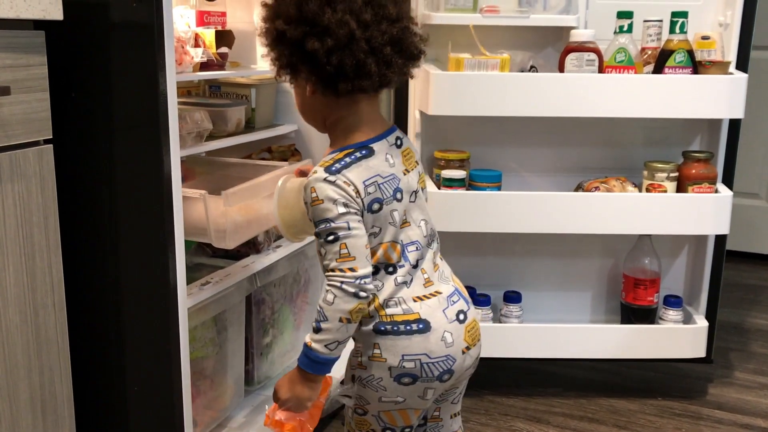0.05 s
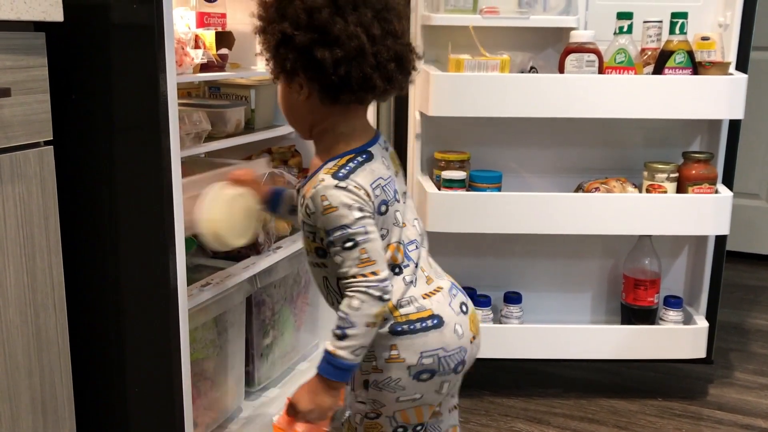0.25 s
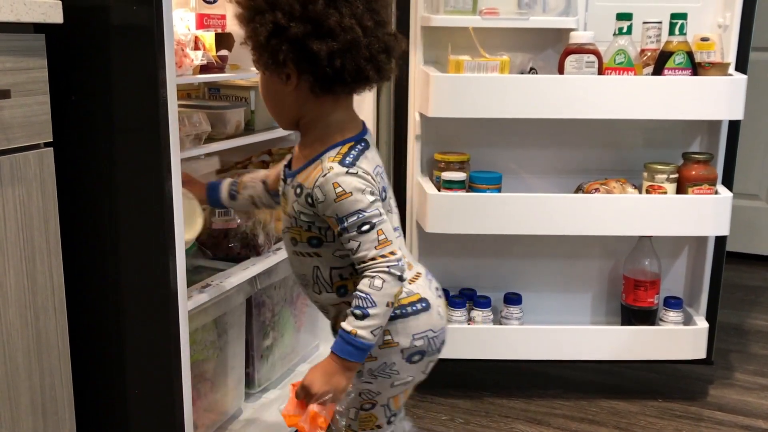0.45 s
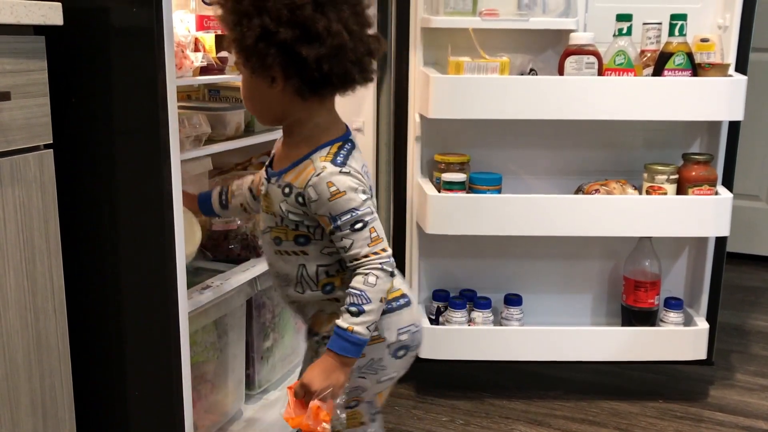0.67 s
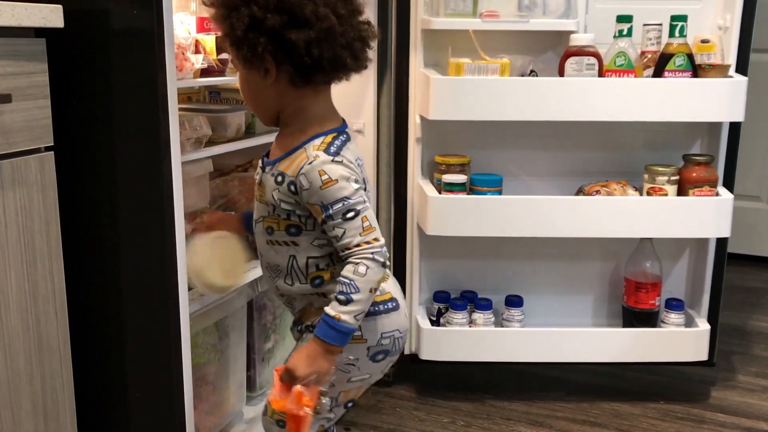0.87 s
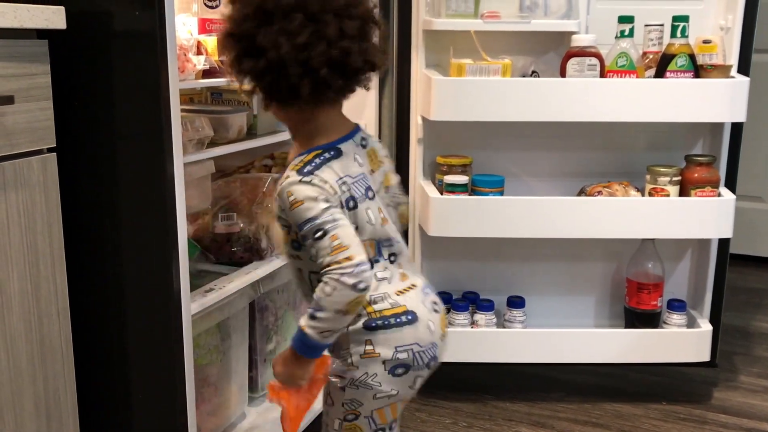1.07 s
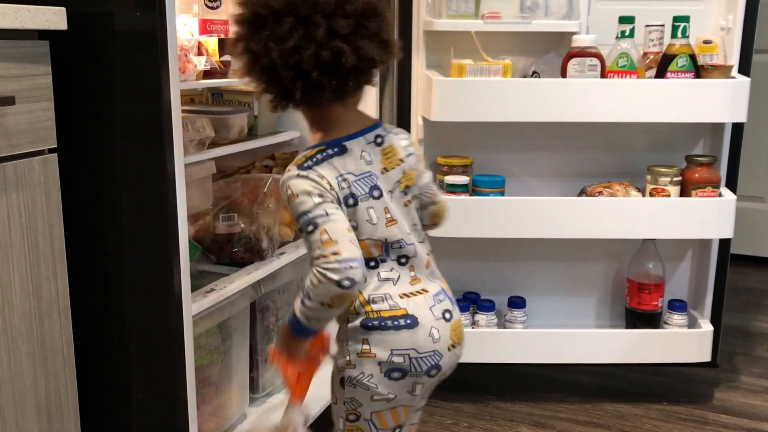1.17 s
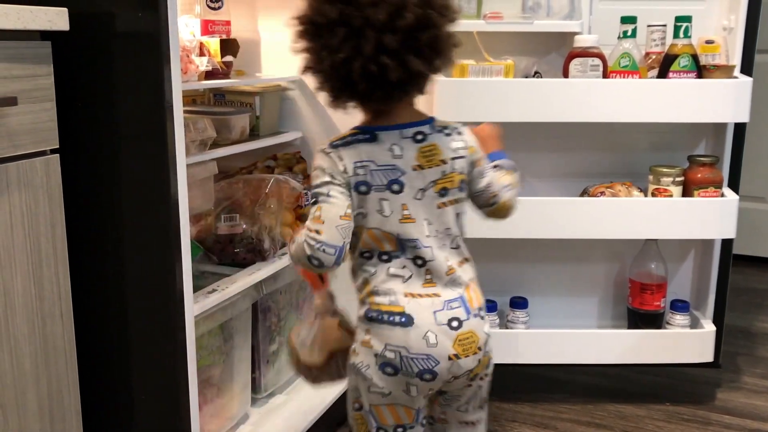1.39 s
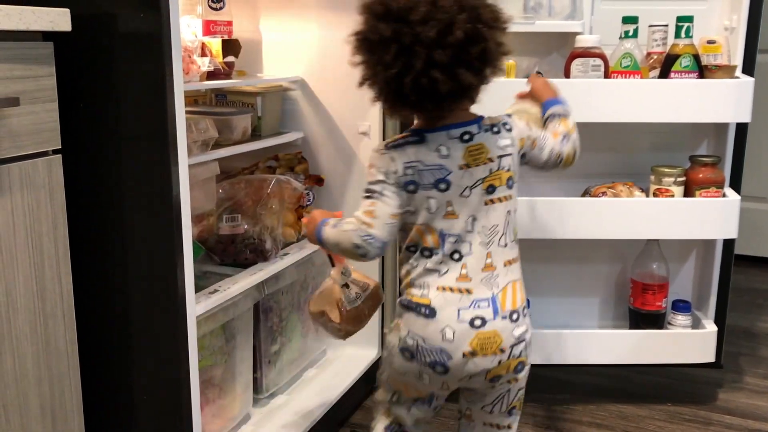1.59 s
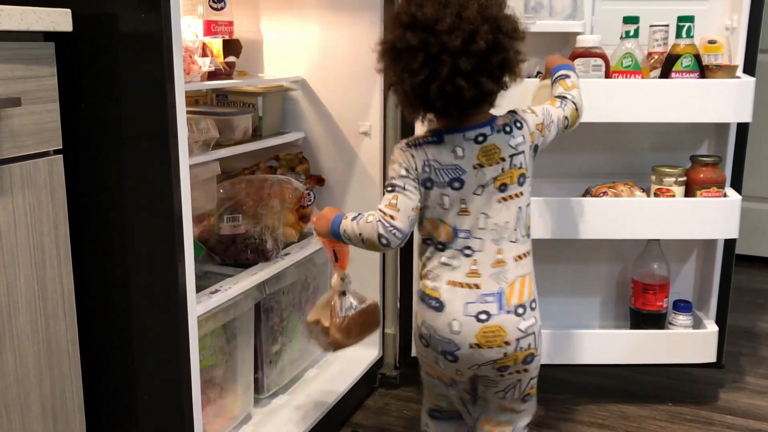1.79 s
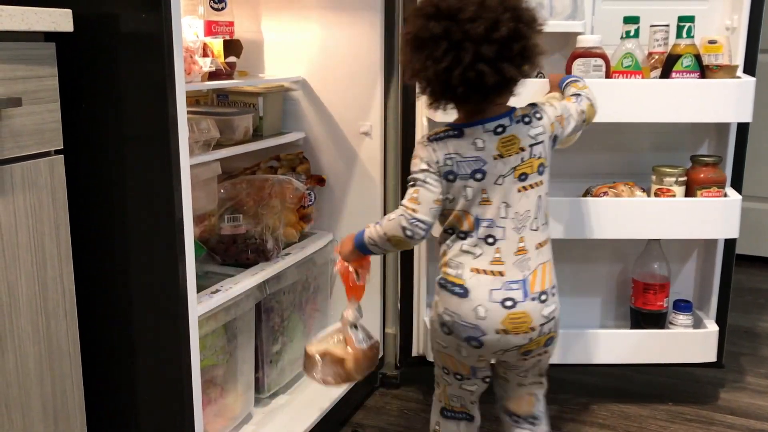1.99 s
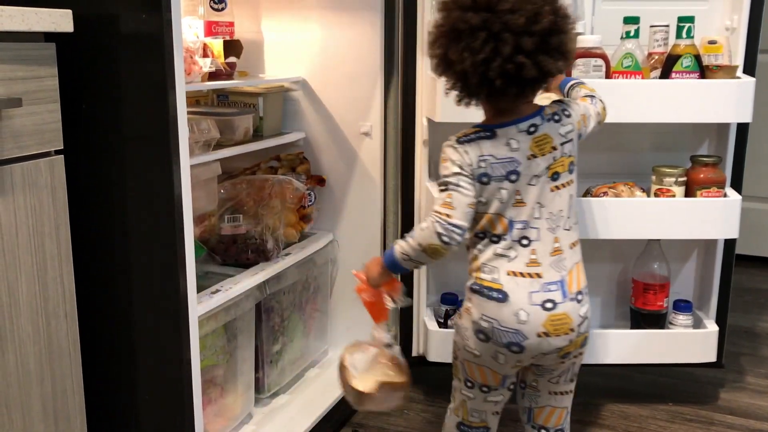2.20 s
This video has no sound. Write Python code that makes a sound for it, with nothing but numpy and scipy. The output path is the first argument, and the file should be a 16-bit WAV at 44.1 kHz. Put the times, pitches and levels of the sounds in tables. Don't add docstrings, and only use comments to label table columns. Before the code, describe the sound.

A plastic refrigerator drawer catches at about 0.2 seconds, knocks sharply near 0.25, and slides with rough chatter until it bangs shut at 0.6, rebounding and rattling until 0.75. Quiet thin-bag crackles and tiny ticks follow from 0.9 to 1.85. At 1.94 a container clunks softly onto a ringing shelf and settles. A low fan hum and short kitchen reverberation surround it, heard by a close small microphone.

```python
import sys
import numpy as np
from scipy import signal
from scipy.fft import rfft, irfft
from scipy.io import wavfile
from scipy.ndimage import uniform_filter1d

SR = 44100
rng = np.random.default_rng(int(sys.argv[2]) if len(sys.argv) > 2 else 0)


def file_out(sig):
    cols = np.atleast_2d(sig).T
    lim = np.clip(cols, -1, 1)
    pcm = np.round(lim * 32767).astype(np.int16)
    wavfile.write(sys.argv[1], SR, pcm)


def ratio(d):
    e = np.asarray(d, float) / 20
    return 10 ** e


N = 99225


def evened(x):
    return x / np.sqrt(np.mean(x ** 2) + 1e-20)


def read(points, hz):
    f, value = np.transpose(points)
    return np.interp(np.log(hz + 1), np.log(f + 1), value)


def add(mix, start_s, sound):
    part = mix[round(start_s * SR):][:len(sound)]
    part += sound[:len(part)]


def colour(x, shape):
    gain = ratio(read(shape, np.fft.rfftfreq(len(x), 1 / SR)))
    return evened(irfft(rfft(x) * gain, len(x)))


def low_part(x, top_hz):
    return signal.lfilter(*signal.butter(2, top_hz, fs=SR), x)


def resonate(x, hz, width_hz):
    r = np.exp(-np.pi * max(width_hz, 1) / SR)
    return 2 * signal.lfilter([1 - r], [1, -r * np.exp(2j * np.pi * hz / SR)], x).real


def narrowed(x, hz, width_hz):
    return evened(resonate(resonate(x, hz, width_hz), hz, width_hz))


def ring(hz, t60_s, rise_s):
    t = np.arange(0, .5, 1 / SR)
    swell = np.sin(np.pi / 2 * np.minimum(t / rise_s, 1)) ** 2
    return swell * ratio(-60 * t / t60_s) * np.sin(2 * np.pi * hz * t)


# top in Hz, length in s.
SLIP_LENGTHS = [(700, 0.0045), (1300, .002), (2000, 0.002), (3000, 0.003), (4500, 0.003), (6500, 0.002),
                (9000, 0.002), (11500, .0015), (14000, .0015), (20000, 0.0015)]


def chatter(count):
    slips_per_s, spread_db, steady_share = 1500, 2.6, 1.2
    out = np.zeros(count)
    hz = np.fft.rfftfreq(count, 1 / SR)
    low_hz = 0
    for top_hz, length_s in SLIP_LENGTHS:
        size, chance = rng.random((2, count))
        slips = ratio(-spread_db * np.log(size + 1e-2)) * (chance < slips_per_s / SR)
        keep = np.exp(-1 / (SR * length_s))
        swells = evened(signal.lfilter([1], [1, -2 * keep, keep ** 2], slips)) ** 2
        puffs = evened((steady_share + swells) * rng.standard_normal(count))
        out += irfft(rfft(puffs) * ((hz >= low_hz) & (hz < top_hz)), count)
        low_hz = top_hz
    return evened(out)


# frequency in Hz, level in dB per Hz.
AIR = [(15, -70), (25, -42), (114, -12.5), (185, -6.5), (326, -14.5), (451, -19.5), (1040, -21.5),
       (7000, -39.5), (16000, -59)]
# frequency in Hz, width in Hz, level in dB.
FAN = [(134, 25, -73), (174.7, 19, -56), (249, 32, -62), (357, 22, -70)]
# time in s, gain in dB.
FLOOR_GAIN = [(0, -6), (.14, -4.5), (.3, 6.5), (.9, 5), (1.3, 4), (2.25, 1)]


def fridge():
    air_db = -57.5
    t = np.arange(N) / SR
    hum = np.zeros(N)
    for hz, width_hz, db in FAN:
        waver = narrowed(rng.standard_normal(N), hz, width_hz)
        hum += ratio(db) * (np.sin(2 * np.pi * hz * t) + .4 * waver)
    s, gain_db = np.transpose(FLOOR_GAIN)
    air = ratio(air_db) * colour(rng.standard_normal(N), AIR)
    return ratio(np.interp(t, s, gain_db)) * (hum + air)


def flexing(x, hz, width_hz):
    share, blur = .08, round(.03 * SR)
    wander = evened(uniform_filter1d(uniform_filter1d(rng.standard_normal(len(x)), blur), blur))
    turn = np.exp(2j * np.pi * np.cumsum(hz * (1 + share * wander)) / SR)
    r = np.exp(-np.pi * max(width_hz, 1) / SR)
    return 2 * (turn * signal.lfilter([1 - r], [1, -r], x / turn)).real


# time in s, effort in dB, rail treble gain above 2.2 kHz in steps of 3 dB.
TRAVEL = [
    (0.145, -47.5, -14),
    (.17, -44.5, -4),
    (0.224, -44.5, 2),
    (0.231, -28, 3.5),
    (0.332, -25, -0.5),
    (.365, -25.5, 1.5),
    (0.453, -29, 1.5),
    (0.575, -32, -3),
    (0.609, -30.5, 2),
]
# frequency in Hz, level in dB per Hz.
RAIL = [(35, -60), (60, -40), (139, -24), (230, -12), (420, 0), (900, 3), (1500, -4), (9130, -25),
        (16000, -47)]
# frequency in Hz, width in Hz, level in dB.
WALLS = [(356, 38, 22.5), (660, 23, 11), (900, 52, 0), (1110, 37, 4), (1780, 30, -10), (3550, 140, 14)]


def slide():
    rail_share, ease_s = 0.8, .004
    s, effort_db, tilt_db = np.transpose(TRAVEL)
    t = np.arange(N) / SR
    slips = chatter(N)
    walls = evened(sum(ratio(db) * evened(flexing(slips, hz, width_hz)) for hz, width_hz, db in WALLS))
    rail = colour(slips, RAIL)
    low = low_part(rail, 2200)
    rail = low + (rail - low) * ratio(3 * np.interp(t, s, tilt_db))
    ease = np.clip(np.minimum(t - s[0], s[-1] - t) / ease_s, 0, 1)
    return ratio(np.interp(t, s, effort_db)) * ease * (rail_share * rail + (1 - rail_share) * walls)


# start in s, peak in dB, ring in Hz, ring t60 in s.
KNOCKS = [(0.1474, -33, 1630, 0.071), (.151, -51, 3050, 0.024), (.160, -28.5, 394, 0.036),
          (.176, -43, 480, 0.037), (.176, -41, 1530, .03), (.229, -18, 918, 0.095),
          (.239, -18.5, 900, 0.041), (.249, -8, 938, 0.021), (.2535, -4, 926, 0.026),
          (.2585, -2.5, 950, 0.017), (.256, -16.5, 3495, .03), (.259, -17, 414, 0.099),
          (.272, -19.5, 1310, 0.044), (.312, -18, 380, 0.053), (.346, -15, 700, 0.034),
          (.363, -19, 935, 0.037), (0.377, -16, 214, 0.055), (.385, -30, 100, .12), (.388, -14, 221, 0.036),
          (.402, -15, 700, 0.052), (0.433, -19.5, 1055, 0.048), (0.471, -16.5, 420, 0.014),
          (0.482, -20, 282, 0.067), (.497, -11, 673, 0.015), (.518, -17, 294, 0.042),
          (.548, -17.5, 338, 0.026), (0.578, -21, 304, 0.026), (.607, -17.5, 574, 0.026),
          (.613, -13, 1270, 0.04), (.622, -14, 1126, 0.036), (.638, -14.5, 1130, 0.027),
          (.664, -16.5, 327, .04), (.692, -23, 850, 0.031), (.755, -28, 630, .03)]


def knocks():
    tick_db, tick_t60_s, rise_s = -14.5, 0.032, 0.0021
    out, t = np.zeros(N), np.arange(2048) / SR
    for start, db, hz, t60_s in KNOCKS:
        tick = narrowed(rng.standard_normal(2048), hz, hz)
        tick = tick * ratio(tick_db - 60 * t / tick_t60_s) * np.minimum(t / rise_s, 1)
        add(out, start, ratio(db) * ring(hz, t60_s, rise_s))
        add(out, start, ratio(db) * tick)
    return out


# frequency in Hz, t60 in s.
ROOM = [(150, 0.26), (600, 0.42), (1450, 0.65), (1900, 0.41), (4000, 0.52), (8000, 0.21), (16000, 0.068)]


def kitchen(x):
    taps = np.zeros(SR)
    at = np.arange(200, SR - 20, 20) + rng.integers(0, 20, (SR - 201) // 20)
    taps[at] = rng.choice([-1., 1.], at.shape)
    hz, t, z = signal.stft(taps, SR, nperseg=256)
    decay = ratio(-60 * t / read(ROOM, hz)[:, None])
    tail = signal.istft(z * decay, SR, nperseg=256)[1]
    return signal.fftconvolve(x, tail / np.linalg.norm(tail))[:N]


# start in s, length in s, level in dB, lowest frequency in Hz.
RUSTLES = [(0.172, 0.12, -48.5, 5100), (0.353, 0.046, -41, 4860), (.586, 0.015, -62, 8900),
           (0.834, 0.026, -67.5, 9100), (1.045, 0.03, -56.5, 4100), (1.15, 0.11, -63.5, 7500),
           (1.285, 0.038, -56.5, 4350), (1.61, 0.086, -76, 11700), (1.7, 0.014, -76, 5000),
           (1.791, 0.049, -58.5, 4840), (1.862, 0.21, -59, 12600), (1.973, 0.076, -58, 7900)]


def bag_rustles():
    out, t = np.zeros(N), np.arange(12000) / SR
    for start, length_s, db, low_hz in RUSTLES:
        high_pass = signal.butter(6, low_hz, "high", fs=SR, output="sos")
        fizz = signal.sosfilt(high_pass, chatter(12000))
        creases = np.zeros(12000)
        for pitch, when in rng.random((round(5 + 60 * length_s), 2)):
            crease = narrowed(fizz, low_hz + pitch * (15500 - low_hz), 500)
            creases += crease * np.exp(-((t - when * length_s) / .018) ** 2)
        fizz = evened(fizz) + .35 * creases
        fade = ratio(-60 * np.maximum(t - length_s, 0) / 0.15)
        add(out, start, ratio(db) * fizz * np.minimum(t / 0.02, 1) * fade)
    return out


# start in s, level in dB, frequency in Hz.
TICKS = [
    (.228, -22, 3000),
    (1.9372, -30, 2800),
]


def ticks():
    out = np.zeros(N)
    for start, db, hz in TICKS:
        cycles = np.arange(60) / SR * hz
        add(out, start, ratio(db) * np.sin(2 * np.pi * cycles) * np.exp(-((cycles - 1) / .5) ** 2))
    return out


# start in s, peak in dB, ring in Hz, breadth from 0 to 1.
SNAPS = [(0.2495, -22, 6000, 1), (0.3586, -20.5, 7440, 0.7), (0.883, -48, 14000, 0.6),
         (1.032, -47, 13500, 0.6), (1.045, -43.5, 6440, 0.47), (1.052, -46, 13000, 0.5),
         (1.059, -43, 8000, 1), (1.073, -47, 8800, 0.6), (1.097, -51, 10700, 0.4), (1.171, -62, 9830, .1),
         (1.22, -37, 10500, 0.97), (1.2213, -40.5, 3100, 0.83), (1.2848, -38, 5800, 0.37),
         (1.294, -40, 2740, 0.2), (1.293, -41.5, 13500, 1), (1.314, -43.5, 2800, 0.55),
         (1.341, -43, 6400, 0.3), (1.3465, -38.5, 12700, 0.6), (1.364, -39.5, 12400, 0.4),
         (1.365, -48, 8500, 0.06), (1.544, -47.5, 2400, 1), (1.564, -41, 5060, 0.4),
         (1.674, -53, 13500, 0.6), (1.719, -45, 14500, 1), (1.72, -64, 9000, 0.04), (1.802, -53, 13000, .8),
         (1.8248, -36, 9500, 0.87), (1.8248, -44, 6000, 0.4)]


def bag_snaps():
    ring_t60_s, puff_t60_s, tail_t60_s, tail_db, rise_s = .018, 0.0082, .06, -8, 0.0016
    out, t = np.zeros(N), np.arange(4096) / SR
    for start, db, hz, breadth in SNAPS:
        noise = rng.standard_normal(4096)
        tones = np.zeros(4096)
        for k, (shift, phase) in enumerate(rng.uniform(-1.04, 1, (3, 2))):
            tone_hz = min(hz * (1 + .5 * breadth * shift * k), 16000)
            tones += np.sin(2 * np.pi * (tone_hz * t + phase)) / (1 + k)
        puff = narrowed(noise, hz, hz * (.08 + .4 * breadth))
        snap = (1 - breadth) * tones * ratio(-60 * t / ring_t60_s)
        snap += breadth * puff * ratio(-60 * t / puff_t60_s)
        snap += puff * ratio(tail_db - 60 * t / tail_t60_s)
        snap *= np.minimum(t / rise_s, 1) ** 2
        add(out, start, ratio(db) * snap / abs(snap).max())
    return out


def blows(rows, shape, body):
    split_hz, dulling = 6000, 0.9
    out, t = np.zeros(N), np.arange(0, .6, 1 / SR)
    for start, db, rise_s, t60_s, boom_db in rows:
        swell = np.minimum(t / rise_s, 1) ** 2
        fade_db = -60 * np.maximum(t - rise_s, 0) / t60_s
        rattle = colour(chatter(len(t)), shape)
        low = low_part(rattle, split_hz)
        treble_db = dulling * (db - rows[0][1]) + fade_db
        add(out, start, ratio(db + fade_db) * swell * (low + (rattle - low) * ratio(treble_db)))
        for (hz, mode_db, mode_t60_s), late in zip(body, rng.random(len(body))):
            mode = ratio(boom_db + mode_db) * ring(hz, mode_t60_s, .5 * rise_s)
            add(out, start + .6 * rise_s + late / hz, mode)
    return out


# start in s, level in dB, rise in s, t60 in s, cabinet boom in dB.
SLAMS = [
    (.597, -16.5, 0.01411, 0.25, -11),
    (.636, -21.5, 0.0076, 0.24, -13),
    (.686, -30.5, 0.01554, 0.16, -16),
    (.745, -38.5, 0.011, 0.13, -29.5),
]
# frequency in Hz, level in dB per Hz.
SLAM_RATTLE = [(35, -24), (60, -12), (118, -29), (222, -48), (354, -5.5), (1140, -3.5), (1380, -8),
               (2520, -12), (16000, -31.5)]
# frequency in Hz, level in dB, t60 in s.
CABINET = [(99, -16, 0.12), (218.5, -2.5, 0.15), (239.7, 1, 0.084), (294, -11.5, 0.16), (461.7, -10, 0.17),
           (689.4, -13, 0.081), (1130, -5, 0.034)]


def slams():
    return blows(SLAMS, SLAM_RATTLE, CABINET)


# start in s, length in s, level in dB, frequency in Hz.
QUIVERS = [(0.809, .02, -45, 825), (0.833, .02, -45, 1100), (0.877, 0.017, -47, 1450),
           (0.968, 0.017, -47, 1300), (.978, .03, -51.5, 1263), (1.039, 0.016, -51, 1234),
           (1.173, 0.025, -66, 9900), (1.568, 0.027, -66, 4950), (1.56, 0.0053, -63, 6900),
           (1.581, 0.066, -58, 2460), (1.612, 0.036, -76, 13900), (1.64, 0.022, -77, 11800),
           (1.68, .028, -72, 12030), (1.713, 0.012, -69, 9030), (1.805, 0.02, -62, 6300),
           (1.805, .012, -60, 11800), (1.858, 0.034, -61, 14400), (1.865, .04, -69, 12800),
           (2.055, 0.01, -35, 1040), (2.06, .012, -51, 2710), (2.071, 0.01, -40, 720),
           (2.105, 0.017, -48, 1450), (2.145, 0.01, -51, 790), (2.15, 0.021, -56, 1500),
           (2.183, .02, -54, 1525), (2.22, 0.0088, -52, 610), (2.018, 0.013, -32, 700),
           (2.039, 0.0081, -35, 815), (.694, 0.033, -20.5, 212), (.748, 0.039, -30.5, 235),
           (2.06, 0.006, -61, 5300), (2.09, .02, -70, 13900), (1.195, 0.026, -68, 8700),
           (2.163, 0.019, -52.5, 244)]


def quivers():
    out, t = np.zeros(N), np.arange(4096) / SR
    for start, length_s, db, hz in QUIVERS:
        rough = narrowed(rng.standard_normal(4096), hz, 2 / length_s + .015 * hz)
        swell = np.sin(np.pi * np.sqrt(np.clip(t / length_s, 0, 1))) ** 2
        add(out, start, ratio(db) * swell * (np.sin(2 * np.pi * hz * t) + 1.1 * rough))
    return out


# start in s, level in dB, rise in s, t60 in s, shelf ring in dB.
SET_DOWN = [
    (1.938, -26.5, 0.022, 0.28, -30.5),
    (1.97, -32, 0.00792, 0.32, -27.5),
    (2.052, -44, 0.00425, 0.12, -49),
]
# frequency in Hz, level in dB per Hz.
SETTING = [(35, -62), (60, -34), (346, -10), (527, -12.5), (698, -12), (1440, -18.5), (3940, -31),
           (5720, -38), (16000, -56)]
# frequency in Hz, level in dB, t60 in s.
SHELF = [(333.5, 1.5, 0.19), (700, 1, 0.15), (1044, -3, 0.055), (1396, -8, .2)]


def set_down():
    return blows(SET_DOWN, SETTING, SHELF)


def scene():
    room_db = -9.5
    near = slide() + knocks() + ticks() + slams() + set_down()
    film = bag_rustles() + bag_snaps() + quivers()
    answer = ratio(room_db) * kitchen(near + .5 * film)
    return (near + film + answer + fridge())[None]


def top_cut(x):
    return signal.sosfilt(signal.butter(12, 16450, fs=SR, output="sos"), x)


def record(dry):
    low_hz, top_hz = 60, 15800
    x = signal.sosfilt(signal.butter(4, low_hz, "high", fs=SR, output="sos"), dry)
    band_limit = signal.firwin(255, top_hz, window=("kaiser", 9), fs=SR)
    mix = signal.oaconvolve(x, band_limit[None], "same")
    return top_cut(mix)


dry = scene()
out = record(dry)
file_out(out)
```